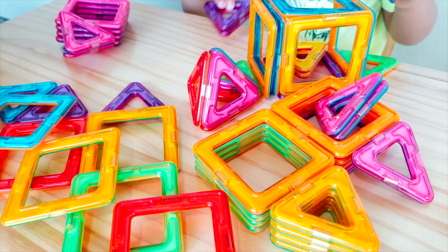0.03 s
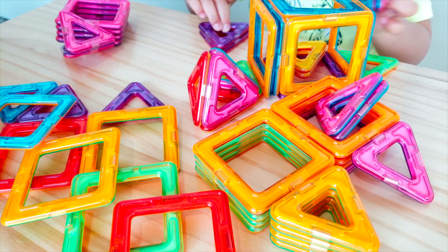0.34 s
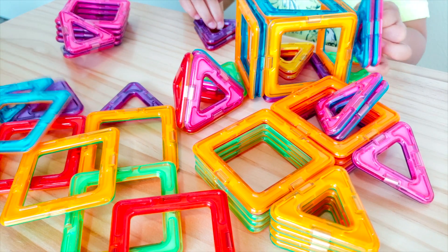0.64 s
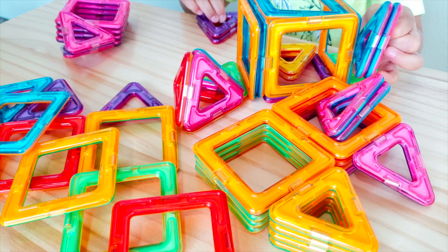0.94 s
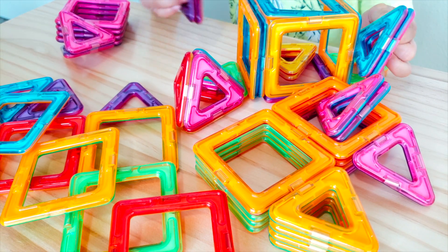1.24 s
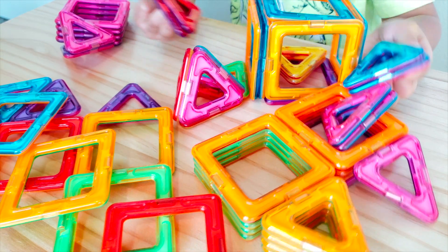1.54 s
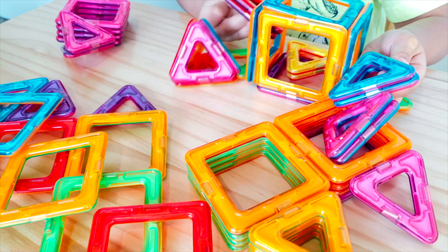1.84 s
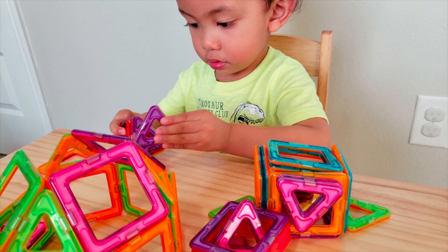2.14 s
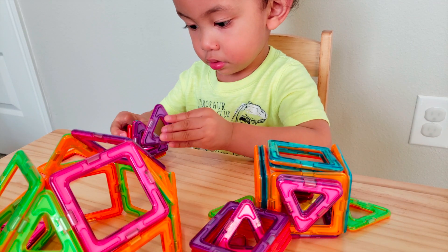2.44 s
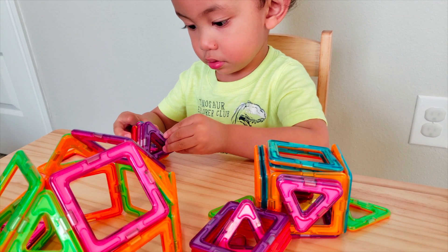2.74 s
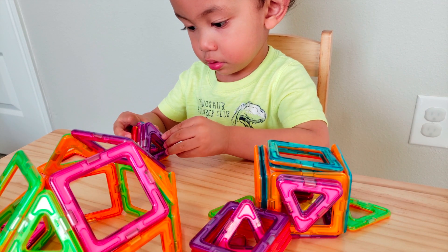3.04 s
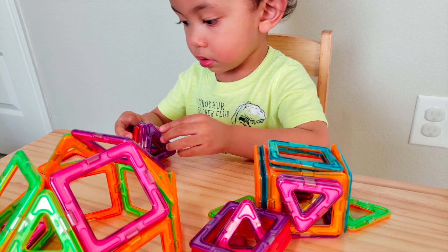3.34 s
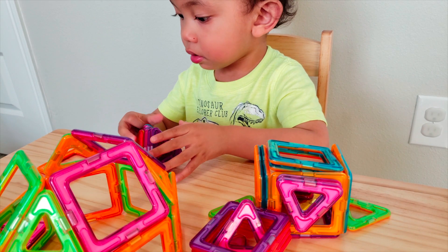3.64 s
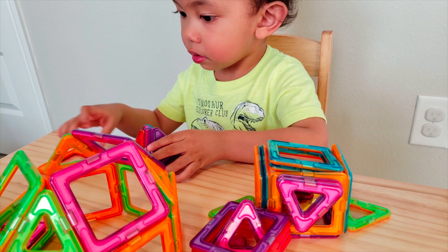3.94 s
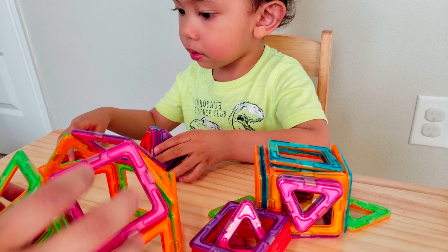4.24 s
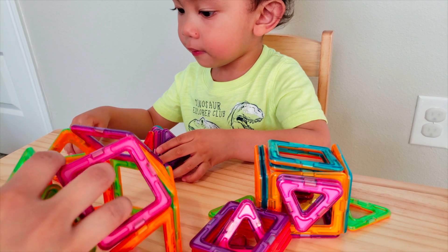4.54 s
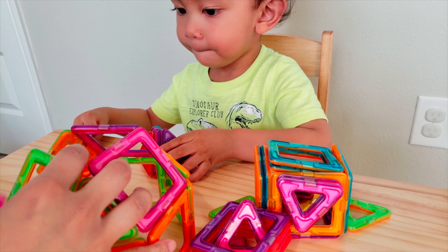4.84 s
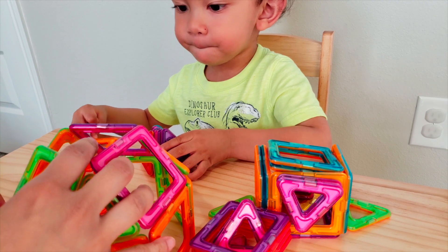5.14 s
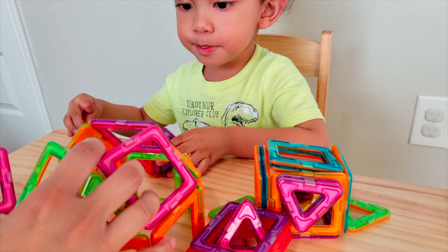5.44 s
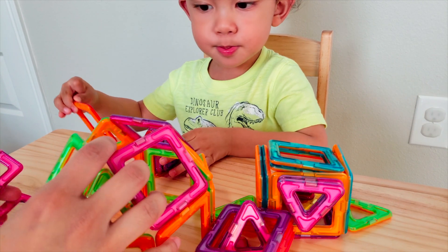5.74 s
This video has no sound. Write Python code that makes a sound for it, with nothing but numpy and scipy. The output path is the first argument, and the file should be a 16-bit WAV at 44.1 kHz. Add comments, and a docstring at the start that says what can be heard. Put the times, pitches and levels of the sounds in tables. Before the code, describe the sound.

Sharp little snaps and light knocks of magnetic toy tiles handled on a wooden table indoors, with a louder clatter as a model folds.

```python
"""Magnetic tiles on a wooden table

Hollow plastic tiles with magnets in their edges are handled in a small, quiet room. Magnets snap them
together, each bump rings a tile's frame and the table top, and pushed stacks make the wood drone.
A tile model is squeezed until it folds with a clatter. The sound drops out briefly just before 2 s."""
import sys
import numpy as np
from scipy import signal
from scipy.fft import rfft, irfft
from scipy.io import wavfile
from scipy.ndimage import uniform_filter1d

SR = 44100
rng = np.random.default_rng(int(sys.argv[2]) if len(sys.argv) > 2 else 0)


def wrap_up_sound(samples):
    """Save the sound to the file named by the first command line argument, as 16-bit audio."""
    columns = np.atleast_2d(samples).T
    # keep every value between -1 and 1, then stretch to whole-number steps
    tamed = np.clip(columns, -1, 1)
    steps = np.round(tamed * 32767).astype(np.int16)
    wavfile.write(sys.argv[1], SR, steps)


N = 259749

# Levels in the tables are relative. t60 is the time a sound takes to fade by 60 dB.
# Tone of the still room: f/Hz, level/dB
AIR_SPECTRUM = [(25, -27), (45, -17), (60, 3), (80, -6), (130, -16), (270, -19.5), (520, -30),
                (1500, -36.5), (9000, -47), (15000, -30)]
# How long the room echoes: f/Hz, t60/s
ROOM_DECAY = [(200, 0.2), (530, 0.31), (1400, 0.42), (3700, 0.45), (7000, 0.46), (10000, 0.37),
              (16000, 0.28)]
# How alike the room sounds on the left and right: f/Hz, likeness (0 to 1)
LIKENESS = [(50, 1), (250, 0.11), (500, 0.054), (1000, 0), (2000, 0.0092)]
# Modes (natural ringing tones) of the table top: f/Hz, level/dB, t60/s
TABLE_MODES = [(200.8, 3, 0.34), (216, 0, 0.16), (256.7, 7, 0.061), (276, -7, .06), (421, -10, 0.092),
               (464.7, 11, 0.061), (495, 0.5, 0.28), (610, -18.5, .1), (724, -21, .1), (850, -33.5, .08),
               (1120, -12, .12), (1610, -21.5, .3)]
# Modes of a hollow tile frame: f/Hz, level/dB, t60/s
FRAME_MODES = [(477, 0, 0.025), (570, -4, 0.051), (757, -1.5, 0.014), (960, -11.5, 0.027),
               (1068, -3, 0.047), (1230, -4, 0.031), (1519, 0.5, 0.013), (1950, -0.5, 0.02),
               (2532.6, -0.5, 0.0083)]
# Modes of a dragged tile: f/Hz, level/dB, t60/s
SQUEAK_MODES = [(700, 9, 0.0086), (1110, 4.5, 0.017), (1680, 0, 0.0047), (2720, -1.5, 0.013),
                (5150, 4.5, 0.0049), (7360, -10, 0.0027), (11300, -15.5, 0.00064)]
# Tone of a magnet edge, which rings too briefly and densely for single modes: f/Hz, level/dB
EDGE_SPECTRUM = [(200, -43), (1000, -13), (2000, -14), (2700, -8.5), (4200, -5.5), (5200, -4.5), (7200, -1),
                 (8300, -6), (9200, -4), (10800, -2), (13500, -5), (15500, -3)]
# Tiles pushed along the wood, one curve per push: t/s, deep level/dB, upper level/dB
PUSHES = [
    [(0.32, -68.5, -63), (0.41, -48.5, -60), (0.48, -41, -45.5), (0.56, -39.5, -47), (0.62, -49.5, -63.5),
     (0.7, -37, -52), (0.88, -76.5, -58), (1.07, -95.5, -66.5), (1.16, -86, -90)],
    [(1.44, -56.5, -62), (1.51, -41.5, -45), (1.64, -41, -39), (1.86, -44.5, -47)],
    [(4.35, -73, -60.5), (4.41, -49.5, -75), (4.76, -41, -47), (4.86, -35, -30.5), (4.97, -41.5, -41.5),
     (5.06, -54.5, -53.5), (5.4, -52.5, -53.5), (5.76, -50, -46), (5.89, -57.5, -62)],
]
# Tiles rustling against each other: peak t/s, rise/s, fall/s, level/dB
RUB_STROKES = [(0.03, 0.21, 0.11, -55.5), (2.02, .2, .04, -63), (3.786, .09, .1, -81), (4.09, .2, .08, -66),
               (4.832, 0.041, 0.15, -24), (5.82, 0.68, 0.24, -60.5)]
# One tile dragged over another: peak t/s, rise/s, fall/s, level/dB
DRAG_STROKES = [(4.16, 0.046, 0.086, -53)]
# Tiles bumping each other (bright) or the table (dull): t/s, level/dB, centre f/Hz
BUMP_HITS = [(0.132, -29.5, 1340), (0.1563, -29.5, 1020), (0.331, -33.5, 850), (0.345, -36.5, 860),
             (0.368, -35.5, 870), (0.423, -36, 714), (0.553, -34.5, 288), (0.649, -36, 1000),
             (0.669, -26.5, 246), (0.671, -31, 1200), (0.772, -33, 235), (1.481, -25.5, 218.4),
             (1.555, -27, 570), (1.69, -28, 1230), (1.784, -32, 404), (2.638, -28, 2300), (2.64, -38, 418),
             (3.215, -46.5, 1490), (3.305, -38.5, 570), (3.322, -37.5, 500), (3.559, -30.5, 680),
             (3.56, -38, 410), (4.503, -27, 440), (4.583, -24.5, 197), (4.584, -34.5, 1150),
             (4.692, -20.5, 317), (4.766, -18, 455), (4.828, -12.5, 423), (4.843, -20.5, 1430),
             (4.848, -19, 245), (4.877, -21, 720), (4.893, -26.5, 473), (4.956, -26, 530),
             (5.628, -32, 484), (5.85, -27.5, 500)]
# How much of a bump goes into the frame: centre f/Hz, level/dB
FRAME_SHARE = [(450, -5.5), (750, 1)]
# How much goes into the table top: centre f/Hz, level/dB
TABLE_SHARE = [(500, -1), (700, -3.5), (1200, -21)]
# Edges snapping together: t/s, level/dB, left minus right/dB
SNAP_HITS = [(0.1164, -31.5, 13), (0.1333, -34, 13), (0.154, -29, 10.5), (0.331, -40.5, 7.5),
             (0.3685, -29, 11), (0.4229, -32, 9), (0.5531, -38, 19.5), (0.662, -26, 14),
             (0.6708, -13.5, 14), (1.4808, -35.5, 6), (1.6748, -19.5, 9), (1.6915, -23, 12.5),
             (2.049, -33.5, 9), (2.3173, -59, -2), (2.5419, -39.5, 7.5), (2.586, -16.5, 9.5),
             (2.6391, -7.5, 9), (2.6717, -11, 7.5), (2.6821, -18.5, 3), (2.858, -40.5, 1),
             (3.2141, -36.5, 10.5), (3.5589, -41.5, 5.5), (4.5854, -44, -2.5), (4.6983, -40.5, 18.5),
             (4.755, -36.5, 10), (4.8287, -12, 11.5), (4.8444, -16.5, 18), (4.8965, -29, 4),
             (4.9598, -17.5, 14.5), (5.358, -55, 20), (5.3686, -45, 13), (5.438, -31.5, 12.5),
             (5.507, -44.5, 17), (5.64, -48.5, 20), (5.7237, -50.5, 23)]


def amp(db):
    """Turns decibels into a gain to multiply by."""
    return 10 ** (np.asarray(db) / 20)


def unit(x):
    """Scales a signal to an average power of 1."""
    return x / np.sqrt(np.mean(x ** 2) + 1e-20)


def look_up(points, hz):
    """Reads a table's value at hz, with octaves evenly spaced."""
    f, value = np.transpose(points)
    return np.interp(np.log(hz + 1), np.log(f), value)


def add(mix, start_s, sound):
    """Mixes a sound in at its start time."""
    part = mix[..., max(round(start_s * SR), 0):][..., :sound.shape[-1]]
    part += sound[..., :part.shape[-1]]


def sides(pan_db):
    """Left and right gains; a positive pan is louder on the left."""
    return amp([[pan_db / 2], [-pan_db / 2]])


def through(x, response):
    """Lets every sample of x set off a copy of the response (convolution)."""
    return signal.fftconvolve(np.atleast_2d(x), np.atleast_2d(response), axes=1)[:, :N]


def ring(modes, size, detune=0, wave=np.sin):
    """A struck object rings as fading tones; detune stands for another tile or spot."""
    hz, db, t60 = np.transpose(modes)[:, :, None]
    t = np.arange(size) / SR
    hz = hz * (1 + detune * rng.standard_normal(hz.shape))
    return (amp(db - 60 * t / t60) / t60 * wave(2 * np.pi * hz * t)).sum(0)


def radiated(x, hz):
    """Cuts the bass: a panel gives off little sound below its lowest mode."""
    return signal.sosfilt(signal.butter(6, hz, "high", fs=SR, output="sos"), x)


def diffuse(spectra, hz):
    """Makes left and right alike in the bass, where long waves reach both sides together."""
    same = np.clip(look_up(LIKENESS, hz), -1, 1)
    left, other = spectra
    return np.array([left, same * left + np.sqrt(1 - same ** 2) * other])


def grains(per_s, spread_db):
    """Tiny impacts of random size at random times."""
    strength = amp(spread_db * np.minimum(rng.exponential(1, N), 4))
    return strength * rng.choice([-1, 1], N) * (rng.random(N) < per_s / SR)


def clumps(depth_db, size):
    """Rubbing catches and lets go: a gain that wanders at random."""
    wander = uniform_filter1d(uniform_filter1d(rng.standard_normal(N), size), size)
    return unit(amp(depth_db * unit(wander)))


def push_gain(column):
    """Gain over time from one level column of the pushes; silent between them."""
    t = np.arange(N) / SR
    gain = np.zeros(N)
    for curve in map(np.array, PUSHES):
        pushing = (t >= curve[0, 0]) & (t <= curve[-1, 0])
        gain += amp(np.interp(t, curve[:, 0], curve[:, column])) * pushing
    return uniform_filter1d(gain, size=300)


def strokes(rows, swell_db=21):
    """Gain of hand strokes: each grows by swell_db over its rise and loses it over its fall."""
    t = np.arange(N) / SR
    return sum(amp(db - swell_db * np.maximum((peak_s - t) / rise, (t - peak_s) / fall))
               for peak_s, rise, fall, db in rows)


def bump_share(share, lowest_hz=0):
    """The part of every bump that reaches one object: t/s, level/dB, centre f/Hz."""
    return [(s, db + look_up(share, hz), max(hz, lowest_hz)) for s, db, hz in BUMP_HITS]


def edge_tick():
    """The short tick of one struck edge."""
    hz = abs(np.fft.fftfreq(512, 1 / SR))
    log_gain = np.log(amp(look_up(EDGE_SPECTRUM, hz)))
    spectrum = np.exp(np.conj(signal.hilbert(log_gain)))  # packs the energy at the start
    tick = np.fft.ifft(spectrum).real[:256]
    return tick / np.linalg.norm(tick)


def air(level_db=-65, swell_db=5.5, split_hz=200):
    """The low, slowly swelling rumble of the house and a faint steady hiss."""
    hz, t = np.fft.rfftfreq(N, 1 / SR), np.arange(N) / SR
    spectra = diffuse(rfft(rng.standard_normal((2, N))), hz) * amp(look_up(AIR_SPECTRUM, hz))
    rumble = irfft(spectra * (hz < split_hz), N)
    hiss = irfft(spectra * (hz >= split_hz), N)
    swell = unit(sum(np.sin(2 * np.pi * (f * t + rng.random())) for f in np.geomspace(.7, 5, 8)))
    return amp(level_db) * unit(rumble * amp(swell_db * swell) * sides(7) + hiss * sides(1))


def room(x, first_s=0.00067, build_s=0.0047, early_db=-9):
    """A few echoes from table and walls and a dense fading tail, new for every spot."""
    t = np.arange(SR * 2 // 3) / SR
    hz, frame_s, spectra = signal.stft(rng.standard_normal((2, len(t))), SR, nperseg=256)
    fade = amp(-60 * frame_s / look_up(ROOM_DECAY, hz)[:, None])
    tail = signal.istft(diffuse(spectra, hz[:, None]) * fade, SR, nperseg=256)[1][:, :len(t)]
    tail *= 1 - np.exp(-np.maximum(t - first_s, 0) / build_s)
    tail /= np.linalg.norm(tail[0])
    for ear in tail:
        echoes = (rng.uniform(.008, .035, size=6) * SR).astype(int)
        ear[echoes] += amp(early_db) * rng.choice([-1, 1], size=6) / np.sqrt(len(echoes))
    return through(x, tail)


def table_sway(hz=58, gain_db=-26, t60=.15):
    """Every bump rocks the whole table on its legs, giving a low thump."""
    out = np.zeros(N)
    thump = ring([(hz, 0, t60)], size=12000)
    for start_s, db, _ in bump_share(TABLE_SHARE):
        add(out, start_s, amp(db + gain_db) * thump / abs(thump).max())
    return out


def push_drone(deep_db=-1, upper_db=-2, frame_db=-14, hand_damping=4):
    """Sliding tiles stick and slip, shaking the table top and the frames, which the hand muffles."""
    slips = grains(per_s=700, spread_db=2.5)
    held_modes = [(hz, db, t60 / hand_damping) for hz, db, t60 in FRAME_MODES[:-1]]
    deep = unit(radiated(through(slips, ring(TABLE_MODES[:4], size=8000)), hz=175))
    upper = unit(radiated(through(slips, ring(TABLE_MODES[4:], size=12000)), hz=350))
    frames = unit(radiated(through(slips, ring(held_modes, size=4000)), hz=590))
    weight, speed = push_gain(column=1), push_gain(column=2)
    hardness = np.minimum(weight / amp(-33.5), 1)  # frames rattle mostly under a hard push
    rattle = np.sqrt(abs(weight * speed * hardness))
    return amp(deep_db) * weight * deep + amp(upper_db) * speed * upper + amp(frame_db) * rattle * frames


def edge_rustle(slide_db=-18, rub_db=-5, grip_db=-40):
    """Edges rub on the wood and on each other, making clumps of very small ticks."""
    ticks = np.array([grains(per_s=2200, spread_db=4.5) for _ in range(2)])
    ticks *= clumps(depth_db=2.5, size=250)
    push = push_gain(column=1)
    grip = np.minimum(push / amp(grip_db), 1)  # the wood needs a hard push to tick
    gain = amp(slide_db) * push * grip + amp(rub_db) * strokes(RUB_STROKES)
    return gain * unit(through(ticks, edge_tick()))


def tile_drag(gain_db=-2):
    """One tile slips over another: a short rasp with a thin squeak in it."""
    slips = grains(per_s=1600, spread_db=-0.5)
    squeak = ring(SQUEAK_MODES, size=1000, wave=np.cos)
    return amp(gain_db) * strokes(DRAG_STROKES) * unit(through(slips, squeak))


def bumps(hits, modes, focus_db_per_octave, detune, cutoff_ratio=2.1):
    """A bump favours the modes near its centre pitch, set by where and how hard it lands."""
    out = np.zeros(N)
    for start_s, db, centre_hz in hits:
        struck = [(hz, mode_db - focus_db_per_octave * abs(np.log2(hz / centre_hz)), t60)
                  for hz, mode_db, t60 in modes]
        knock = radiated(ring(struck, size=12000, detune=detune), hz=.8 * modes[0][0])
        knock = signal.lfilter(*signal.butter(4, cutoff_ratio * centre_hz, "low", fs=SR), knock)
        add(out, start_s, amp(db) * knock / abs(knock).max())
    return out


def magnet_snaps(chatter_s=.0014, settle_s=0.008, shell_s=0.00094, beam_hz=2400):
    """Magnets slam two edges together; they chatter for a millisecond or two, then settle."""
    out, plain_tick = np.zeros((2, N)), edge_tick()
    t = np.arange(900) / SR
    contact = np.exp(-t / chatter_s) + amp(-17) * np.exp(-t / settle_s)
    length_gain = np.sqrt(.002 * SR)  # a snap's energy is spread over about 2 ms
    for start_s, db, pan_db in SNAP_HITS:
        shared, left, right, shell = rng.standard_normal((4, len(t)))
        shell *= np.exp(-t / shell_s)  # waves crossing the shell give each pair of tiles its own tone
        tick = through((t == 0) + amp(-9) * shell / np.linalg.norm(shell), plain_tick)
        tick /= np.linalg.norm(tick)
        chatter = contact * (shared + 0.84 * np.array([left, right]))  # each side hears its own mix
        click = through(chatter, tick)
        # the treble is beamed straight at the listener
        click = signal.lfilter(*signal.butter(2, beam_hz, "high", fs=SR), click)
        click /= np.linalg.norm(click, axis=1, keepdims=True)
        click[1] = np.roll(click[1], 7)  # the right side is a little farther away
        room_db = db + 2 - 0.8159 * pan_db  # tiles nearer the left side have less echo
        add(out, start_s, length_gain * amp(db - 5) * click * sides(pan_db))
        add(out, start_s, length_gain * amp(room_db) * room(tick) * sides(2))
    return out


def scene():
    """Mixes all the sources, a little left of centre, with the room's echo."""
    frame_hits = bump_share(FRAME_SHARE, lowest_hz=570)  # even a dull bump rings the frame here
    clacks = amp(-1.5) * bumps(frame_hits, FRAME_MODES, focus_db_per_octave=7, detune=0.058)
    knocks = bumps(bump_share(TABLE_SHARE), TABLE_MODES, focus_db_per_octave=10.5, detune=0.012)
    wood = knocks + push_drone()
    rustle, rasp = edge_rustle(), tile_drag()
    tiles = amp(4.5) * (rustle + rasp) * sides(3) + clacks * sides(5)
    table = wood * sides(3.5) + table_sway() * sides(7)
    echo = room(amp(2.5) * clacks + amp(1) * rasp) + room(amp(-7.5) * wood + amp(-1.5) * rustle[0])
    return magnet_snaps() + tiles + table + echo * sides(2) + air()


def record(dry):
    """Clips the sharpest peaks, drops the sound out briefly and cuts the highest treble."""
    gap_start_s, gap_end_s, top_hz = 1.857, 1.933, 15900
    clipped = np.clip(dry, -.85, .85)
    t = np.arange(N) / SR
    in_gap = (t > gap_start_s) & (t < gap_end_s)
    gate = uniform_filter1d(1. - in_gap, size=130)
    lowpass = signal.firwin(255, top_hz, window=("kaiser", 8), fs=SR)
    return signal.oaconvolve(clipped * gate, lowpass[None], "same")


dry = scene()
out = record(dry)
wrap_up_sound(out)
```